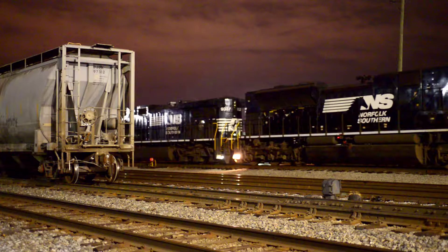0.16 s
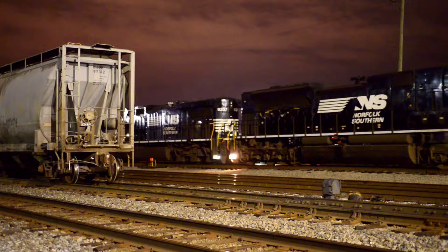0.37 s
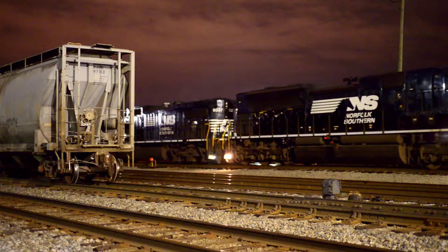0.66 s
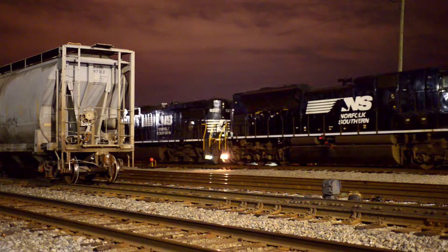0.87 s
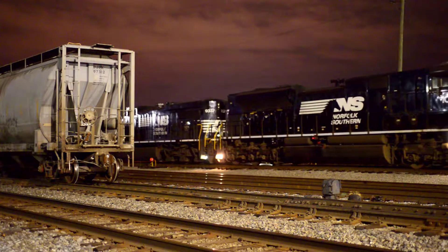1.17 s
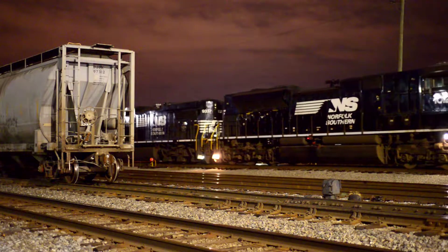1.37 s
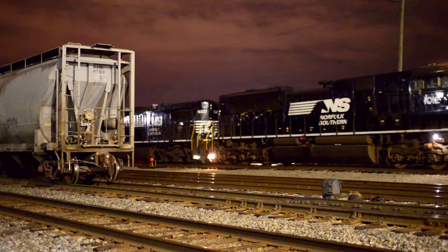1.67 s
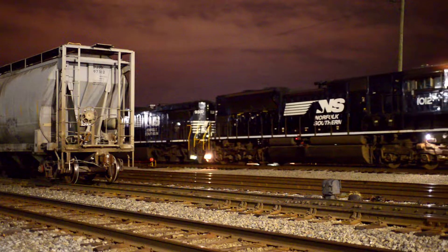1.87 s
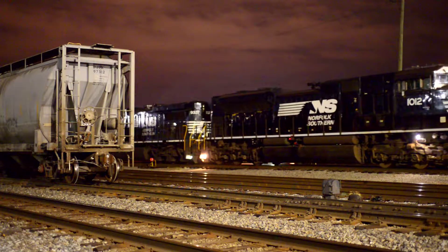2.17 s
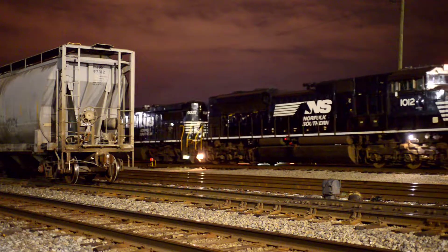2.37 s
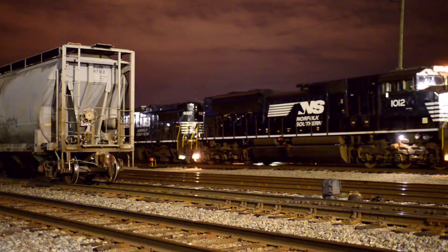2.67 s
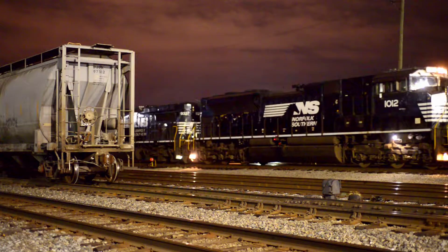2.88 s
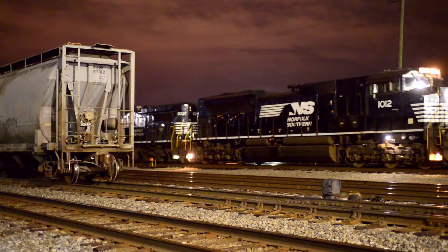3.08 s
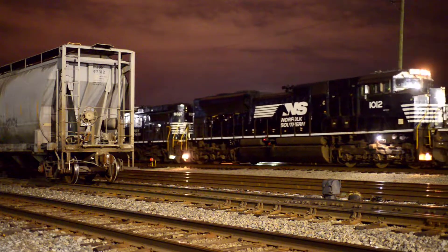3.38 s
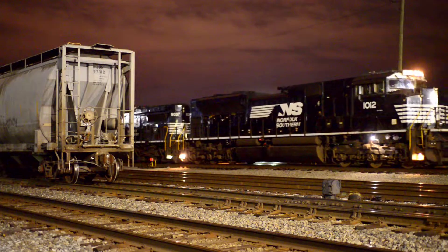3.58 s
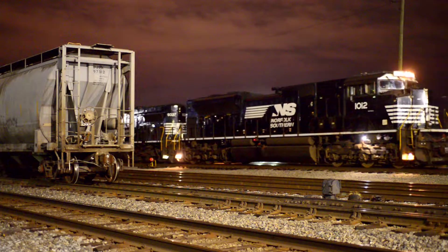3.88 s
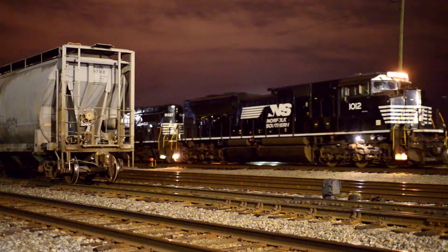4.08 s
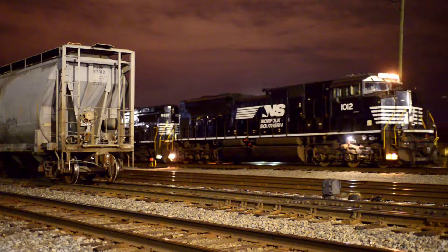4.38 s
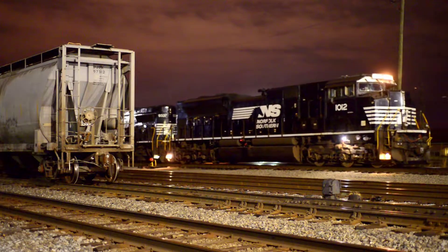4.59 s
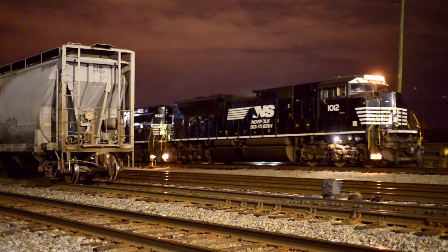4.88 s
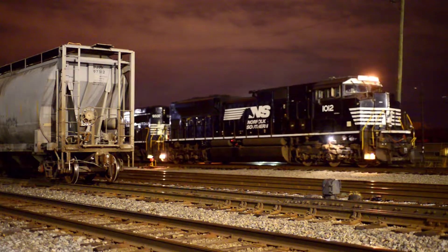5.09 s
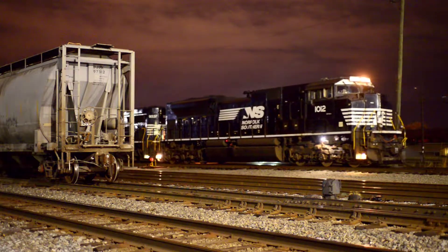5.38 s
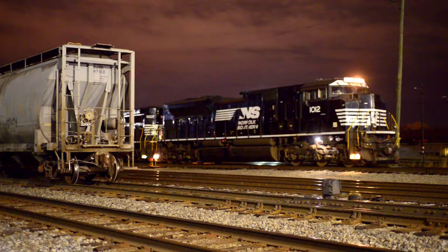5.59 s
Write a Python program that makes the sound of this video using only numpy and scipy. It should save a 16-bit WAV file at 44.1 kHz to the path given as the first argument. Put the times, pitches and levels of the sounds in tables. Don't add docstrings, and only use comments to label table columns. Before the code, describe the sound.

Two diesel locomotives creep past with a deep throbbing rumble and clattering roar, while loose steel knocks, brakes rub, and air spits late.

```python
import sys
import numpy as np
from scipy import signal
from scipy.fft import rfft, irfft, next_fast_len
from scipy.io import wavfile
from scipy.ndimage import uniform_filter1d

SR = 44100
rng = np.random.default_rng(int(sys.argv[2]) if len(sys.argv) > 2 else 0)


def makeup_ratio(level_db):
    decades = np.asarray(level_db, float) / 20
    return 10 ** decades


def int16_out(signal):
    q = np.round(np.clip(np.atleast_2d(signal).T, -1, 1) * 32767)
    wavfile.write(sys.argv[1], SR, q.astype(np.int16))


N = 253034
TIME = np.arange(N) / SR
HZ = np.fft.rfftfreq(next_fast_len(N, True), 1 / SR)

# time in seconds, speed in crank turns a second.
CRANK_SPEED = [(0.0, 6.466), (0.41, 6.672), (0.82, 6.728), (1.23, 6.694), (1.64, 6.653), (2.05, 6.581),
               (2.46, 6.484), (2.87, 6.418), (3.28, 6.361), (3.69, 6.411), (4.1, 6.465), (4.51, 6.585),
               (4.92, 6.76), (5.33, 6.925), (5.74, 7.19)]
# order in cycles a crank turn, level in dB.
EXHAUST_TONES = [(4, -57), (5, -54), (6, -42), (7, -42), (10, -26.5), (11, -40), (12, -33), (13, -29),
                 (14, -44), (15, -32), (16, -34), (17, -32), (18, -45), (19, -47), (20, -41), (21, -44),
                 (23, -48), (24, -37.5), (25, -42), (26, -45), (29, -46), (30, -43), (32, -48)]
# time in
# seconds, lift in dB.
STACK_FACING = [(0, 2), (1, 2.5), (2.3, -1), (3.5, -1), (4.6, -0.5), (5.74, -0.5)]
# order in cycles of its own crank turn, level in dB.
SECOND_TONES = [(10, -44), (13, -29), (14, -40), (15, -33), (17, -37), (18, -34), (19, -42), (21, -44),
                (27, -43)]
# time in seconds, change in dB.
SECOND_SWELL = [
    (0, -1),
    (1.8, -6),
    (2.8, 2),
    (4.5, 6),
    (5.74, -9.5),
]
START_RAD, LEAD_RAD, SILENCER_RAD = 0, 1.24, .55
SECOND_RATIO, SECOND_RAD, SECOND_START_RAD = .7477, 1.45, 2.8
STACK_HZ, STACK_HALF_WIDTH_HZ, EIGHTH_DB, NINTH_DB = 55.05, 3.5, -11.5, -16

GEAR_ORDERS = [104, 158.5, 374.75, 440.8]
# order in cycles a crank turn, level in dB.
FAINT_GEARS = [(41, -47), (65, -49), (92, -46), (93, -46), (96, -44), (97, -44), (187.5, -53), (192, -53)]
# order in cycles a crank turn, time in seconds,
# half length in seconds, level in dB.
GEAR_FACING = [(104, 2.224, .3, -32.5), (104, 3.32, 0.4, -36), (158.5, .6, 0.22, -42.5),
               (158.5, 1.34, 0.46, -44.5), (158.5, 4.52, .12, -49), (374.75, .7, .15, -48),
               (374.75, 1.3, 0.23, -47.5), (374.75, 5.68, .22, -45), (440.8, .75, .25, -41),
               (440.8, 1.74, 0.19, -50.5), (440.8, 2.65, 0.6, -52.5), (440.8, 3.71, 0.13, -44),
               (440.8, 4.3, 0.32, -45.5), (440.8, 5.55, .3, -47)]
MESH_FLOOR_DB = -56.5

# time in seconds, level in dB.
INTAKE_LEVEL = [(0, -50), (.35, -44), (1.7, -46), (2.0, -43), (2.4, -44), (2.7, -47), (3.2, -47.5),
                (3.8, -46), (4.2, -48), (4.54, -44.5), (4.9, -50.5), (5.35, -45), (5.74, -44.5)]
TURBO_ORDER, TURBO_WIDTH, TURBO_OCTAVE_DB = 901, .054, -22

# frequency in Hz, level in dB per Hz.
ROAR_COLOUR = [(30, -18), (45, 7.5), (70, 12.5), (130, 5), (230, -6), (350, -9), (480, -4.5), (660, -2),
               (920, -8.5), (1700, -10), (2150, -15), (3200, -15), (5000, -26), (15500, -53.5)]
# frequency in Hz, width in Hz, lift in dB.
CASING_MODES = [(274, 86, 3), (450, 87, 3), (606, 17, 2), (690, 24, 4), (735, 33, 1), (3300, 970, 2.5)]
# time in seconds, change in dB.
LOUVRES = [(0, 0), (.7, -1.5), (1.25, -4.5), (1.9, -1.5), (2.5, -1.5), (3.1, 1), (3.5, 0), (4.3, 2.5),
           (4.8, .5), (5.2, 4), (5.5, -0.5), (5.74, 3)]
BLOCK_DB, HOOD_DB, TAPPET_DB = -30, -33.3, -35.3
BLOCK_SHARE, HOOD_SHARE = 0.57, .45
SHADE_S, SHADE_SPAN_S, SHADE_DB, SHADE_HOOD_DB = 4.02, 0.45, -3.5, -3.5

CHATTER_DB, SLACK_S, SLACK_SPAN_S, SLACK_DB = -52, 3.3, 0.92, 10
CLIMB_S, CLIMB_SPAN_S, NARROW_HZ, CLIMB_HZ, NARROW_DB, CLIMB_DB = 3.2, .35, 1288, 430, -45.5, 5.5

# start in seconds, peak in dB, ring in Hz.
KNOCKS = [(0.0438, -32, 2880), (0.0703, -23, 2760), (0.196, -37, 3080), (0.5566, -23, 2520),
          (1.823, -21.5, 2960), (1.9235, -30, 2980), (2.392, -23, 2900), (2.877, -23, 3180),
          (2.9194, -21.5, 3340), (3.045, -19, 2820), (3.1293, -16.5, 3250), (3.3423, -17, 3320),
          (3.4273, -23, 3280), (3.5488, -23, 3300), (3.5994, -22, 2770), (3.7614, -13.5, 3320),
          (3.8023, -22, 3070), (3.9205, -19, 3050), (4.0971, -19.5, 2910), (4.158, -17, 3300),
          (4.3794, -29, 2890), (4.4544, -31, 3130), (4.5297, -17, 3080), (4.6794, -20, 2960),
          (4.781, -21, 3060), (4.8584, -22, 3480), (5.1787, -16.5, 3400), (5.3684, -29, 3050)]
RUSTLE_DB = -24
# start in seconds, level in dB.
JINGLES = [(3.043, -48), (3.065, -51), (3.15, -54), (3.76, -56), (4.157, -48), (4.19, -49), (4.7, -57),
           (5.195, -51), (5.235, -56)]
# frequency in Hz, level in dB, time to fall 60 dB in seconds.
CHAIN_MODES = [(4221, 7, .1), (6444, -1, .16), (7400, -5, .1), (8900, -12, .08), (10010, -11, .1),
               (10790, -7, .14), (12240, -13, .08), (12720, -11, .16), (13630, -14, .15), (15400, -15, .08),
               (8100, -9, .07), (9550, -10, .09), (11500, -13, .07), (14300, -16, .08)]
# centre in seconds, length in seconds, pitch in Hz, level in dB.
SQUEAKS = [
    (4.53, 0.021, 1690, -24.5),
    (2.69, 0.029, 1406, -33.5),
    (0.63, 0.069, 1520, -39),
    (3.29, 0.014, 1630, -32),
]
# centre in seconds, length in seconds, pitch in Hz, level in dB.
FLANGE = (5.2, .5, 8900, -72)

# frequency in Hz, level in dB.
SPIT_COLOUR = [(800, -18), (1500, -13), (2300, -0.5), (3400, 0), (4400, -5.5), (8000, -13), (12000, -17.5),
               (15500, -25)]
SPIT_S, PEAK_S, SHUT_S, OPEN_S = 4.988, 5.065, 5.105, .016
SPIT_DB, SAG_DB_PER_S, SHUT_DB_PER_S = -30, -66, -230
DRIBBLE_DB, DRIBBLE_END_S = -48, 6.3
CEILING = .75


def unit(x):
    return x / np.sqrt(np.mean(x ** 2))


def walk(rate):
    k = int(SR / rate)
    held = np.repeat(rng.standard_normal(N // k + 1), k)
    return unit(uniform_filter1d(uniform_filter1d(held, k), k)[:N])


def follow(points):
    return np.interp(TIME, *np.transpose(points))


def bump(s, span):
    return np.exp(-((TIME - s) / span) ** 2)


def rise(s, span):
    return .5 + .5 * np.tanh((TIME - s) / span)


def slope(points, hz):
    f, db = np.transpose(points)
    return makeup_ratio(np.interp(np.log(hz + 1), np.log(f), db))


def hiss(gain):
    size = next_fast_len(N, True)
    return irfft(rfft(rng.standard_normal(size)) * gain, size)[:N]


def tone(angle, db):
    return np.sqrt(2) * makeup_ratio(db) * np.cos(angle)


def ring(hz, t60, length=.3):
    t = TIME[:int(length * SR)]
    return np.sin(2 * np.pi * hz * t) * np.exp(-np.log(1000) * t / t60)


def add(out, s, x):
    i = int(s * SR)
    out[i:i + len(x)] += x[:N - i]


def exhaust(angle, eighth_db, ninth_db):
    def phase(k):
        past_node = np.pi * (k > 14)
        silencer = SILENCER_RAD * (k % 2 == 0) * (k < 17)
        return k * (angle + LEAD_RAD) + START_RAD + past_node + silencer

    facing_db = follow(STACK_FACING)
    out = tone(phase(8), eighth_db + .4 + .3 * walk(6))
    out += tone(phase(9), ninth_db + .8 * walk(6))
    for k, db in EXHAUST_TONES:
        tilt_db = facing_db * ((14 < k < 18) - (k > 17))
        out += tone(phase(k) + .2 * walk(2), db + tilt_db + 1.5 * walk(2.5))
    swell_db = follow(SECOND_SWELL)
    for k, db in SECOND_TONES:
        second_angle = k * (SECOND_RATIO * angle + SECOND_RAD) + SECOND_START_RAD
        out += tone(second_angle, db + swell_db + 1.5 * walk(1.5))
    return out


def gears(angle):
    out = np.zeros(N)
    for k in GEAR_ORDERS:
        gain = makeup_ratio(MESH_FLOOR_DB)
        for order, s, span, db in GEAR_FACING:
            if abs(order / k - 1) < .1:
                gain = gain + makeup_ratio(db) * bump(s, span)
        out += gain * tone(k * angle + .6 * walk(14), 1 + 3 * walk(9))
    shade_db = SHADE_DB * rise(SHADE_S, SHADE_SPAN_S)
    for k, db in FAINT_GEARS:
        out += tone(k * angle + .5 * walk(9), db + shade_db + 3 * walk(2.16))
    return out


def turbo(angle, intake_db):
    out = 0
    wobble = 2 * np.pi * np.cumsum(40 * walk(45)) / SR
    for k, db in ((1, 0), (2, TURBO_OCTAVE_DB)):
        half_width_hz = k ** .6 * 5 * TURBO_ORDER * TURBO_WIDTH / 2
        shape = 1 / (1 + (HZ / half_width_hz) ** 2)
        carrier = k * (TURBO_ORDER * angle + wobble)
        whine = hiss(shape) * np.cos(carrier) + hiss(shape) * np.sin(carrier)
        out = out + makeup_ratio(db) * unit(whine)
    return out * makeup_ratio(intake_db + 0.86 * np.cos(angle - 4.4) + 1.05 * walk(20))


def roar(angle, block_db, hood_db, tappet_db):
    def cased(hz):
        modes_db = sum(db / (1 + (2 * (hz - f) / w) ** 2) for f, w, db in CASING_MODES)
        return slope(ROAR_COLOUR, hz) * makeup_ratio(modes_db)

    colour = cased(HZ)
    common = .6 * walk(14) + .9 * walk(60)
    sway = [0 * angle] + [c - c.mean() for c in (block_db, hood_db, tappet_db, .5 * tappet_db)]
    region_hz = np.log([250, 620, 1500, 3300, 9000])
    noise = 0
    for hz in 30 * 2 ** np.arange(0, 9.6, .5):
        band = np.clip(1 - abs(2 * np.log2((HZ + 1) / hz)), 0, 1) ** .5
        place = np.interp(np.log(hz), region_hz, range(5))
        near = np.clip(1 - abs(place - np.arange(5)), 0, 1)
        flicker = min(hz / 4000, 1) * 1.3 * common + 0.62 * walk(14)
        noise = noise + hiss(colour * band) * makeup_ratio(near @ sway + flicker + 0.93 * np.cos(angle - 3.9))
    orders = np.arange(34, 125)
    around = np.linspace(0, 2 * np.pi, 2049)
    waves = np.cos(np.outer(around, orders) + 2 * np.pi * rng.random(len(orders)))
    one_turn = waves @ (cased(6.4 * orders) * makeup_ratio(7.9 * rng.standard_normal(len(orders))))
    clatter = unit(np.interp(angle % (2 * np.pi), around, one_turn))
    return makeup_ratio(-23.5) * unit(noise) + makeup_ratio(block_db - 6 + 1.46 * walk(3.96)) * clatter


def rods_and_band():
    chatter_db = CHATTER_DB + SLACK_DB * bump(SLACK_S, SLACK_SPAN_S)
    hits = rng.random(N) < 130 / SR
    taps = hits * makeup_ratio(3 * rng.exponential(size=N)) * makeup_ratio(chatter_db - 1.5)
    rod = ring(3300, .05, .06) + .6 * ring(3080, .04, .06) + .4 * ring(4250, .03, .06)
    chatter = signal.fftconvolve(taps, rod)[:N]
    climb = rise(CLIMB_S, CLIMB_SPAN_S)
    narrow_hz = (NARROW_HZ + CLIMB_HZ * climb) * (1 + .03 * walk(12))
    sweep = 2 * np.pi * np.cumsum(narrow_hz) / SR
    narrow_band = unit(hiss(np.exp(-(HZ / 80) ** 2))) * np.cos(sweep)
    return chatter + makeup_ratio(NARROW_DB + CLIMB_DB * climb + 2 * walk(16)) * narrow_band


def knocks():
    out = np.zeros(N)
    bright = unit(hiss(np.exp(-((HZ - 6500) / 4500) ** 2)))
    t = TIME[:2000]
    for s, db, hz in KNOCKS:
        grit = rng.standard_normal(2000) * np.exp(-t / 0.017)
        body = ring(hz, .018, .04) + .2 * ring(1.29 * hz, .012, .04)
        knock = np.convolve(grit, body)[:2000]
        i = min(int(s * SR), N - 2000)
        rustle = bright[i:i + 2000] * np.hanning(2000) ** .3 * np.exp(-t / .06)
        add(out, s, makeup_ratio(db - 6) * (knock / abs(knock).max() + makeup_ratio(RUSTLE_DB) * rustle))
    return out


def squeaks():
    out = np.zeros(N)
    for s, length, hz, db in [*SQUEAKS, FLANGE]:
        squeal = unit(hiss(np.exp(-((HZ - hz) * length / 2.4) ** 2)))
        out += makeup_ratio(db) * bump(s, length) * squeal
    return out


def chain():
    out = np.zeros(N)
    for s, db in JINGLES:
        blow_db = 2.5 * rng.standard_normal(len(CHAIN_MODES))
        links = sum(makeup_ratio(db + d + b) * ring(hz, t60) for (hz, d, t60), b in zip(CHAIN_MODES, blow_db))
        shake = rng.standard_normal(1300) * (rng.random(1300) < .01) * np.hanning(1300)
        add(out, s - .008, signal.fftconvolve(links, shake / np.linalg.norm(shake)))
    return out


def valve():
    def shutting_db(s):
        return SHUT_DB_PER_S * np.maximum(TIME - s, 0)

    blast_db = SPIT_DB + SAG_DB_PER_S * abs(TIME - PEAK_S) + shutting_db(SHUT_S)
    dribble_db = DRIBBLE_DB + shutting_db(DRIBBLE_END_S)
    opening_db = -20 * np.maximum(SPIT_S - TIME, 0) / OPEN_S
    level_db = np.maximum(blast_db, dribble_db) + opening_db + 1.3 * walk(60)
    return makeup_ratio(level_db) * unit(hiss(slope(SPIT_COLOUR, HZ)))


def scene():
    speed = follow(CRANK_SPEED)
    angle = 2 * np.pi * np.cumsum(speed) / SR

    def stack_db(k):
        return -10 * np.log10(1 + ((k * speed - STACK_HZ) / STACK_HALF_WIDTH_HZ) ** 2)

    open_db = follow(LOUVRES)
    shade = rise(SHADE_S, SHADE_SPAN_S)
    block_db = BLOCK_DB + SHADE_DB * shade + BLOCK_SHARE * open_db + 0.45 * walk(3.13)
    hood_db = HOOD_DB + HOOD_SHARE * open_db + SHADE_HOOD_DB * shade + 0.74 * walk(3.12)
    engine = exhaust(angle, EIGHTH_DB + stack_db(8), NINTH_DB + stack_db(9))
    engine += gears(angle) + turbo(angle, follow(INTAKE_LEVEL))
    engine += roar(angle, block_db, hood_db, TAPPET_DB + open_db)
    mix = engine + rods_and_band() + knocks() + squeaks() + chain() + valve()
    return (mix * np.minimum(TIME / 0.0018, 1))[None]


def low_pass(x):
    return signal.sosfilt(signal.butter(12, 15640, fs=SR, output="sos"), x)


def record(dry):
    limited = dry / (1 + abs(dry / CEILING) ** 5) ** (1 / 5)
    return low_pass(limited + .001)


dry = scene()
out = record(dry)
int16_out(out)
```